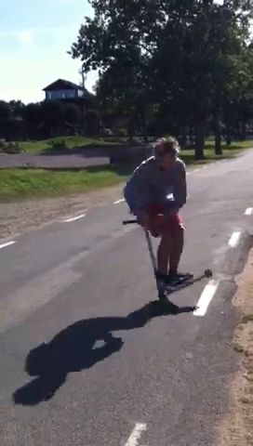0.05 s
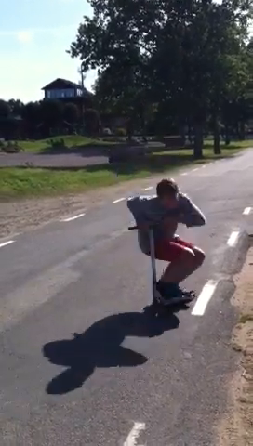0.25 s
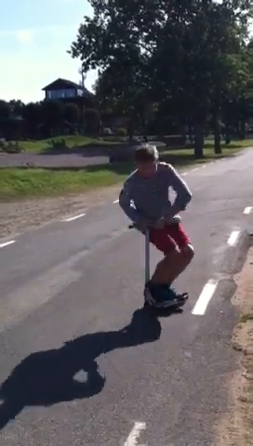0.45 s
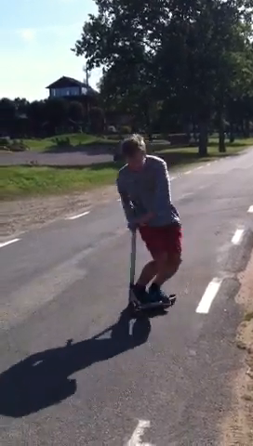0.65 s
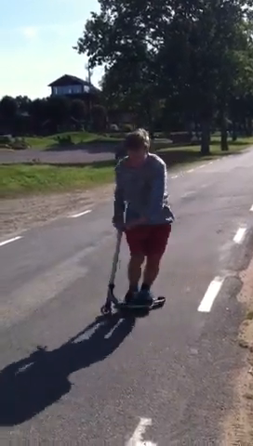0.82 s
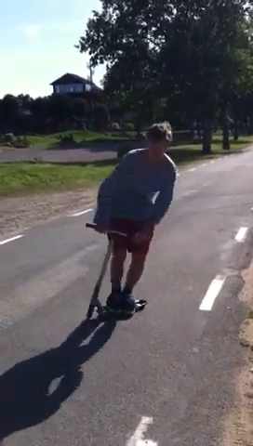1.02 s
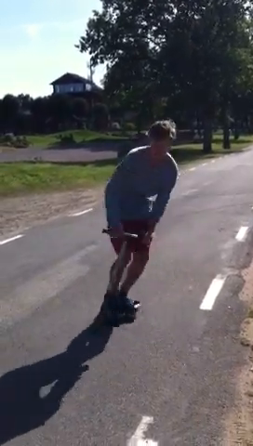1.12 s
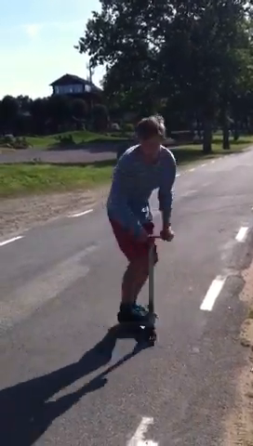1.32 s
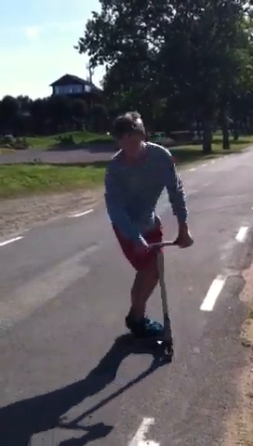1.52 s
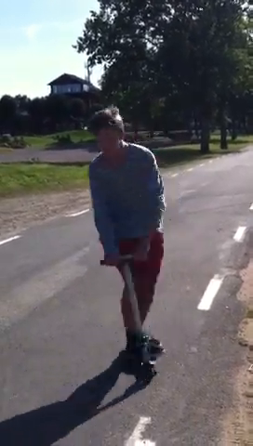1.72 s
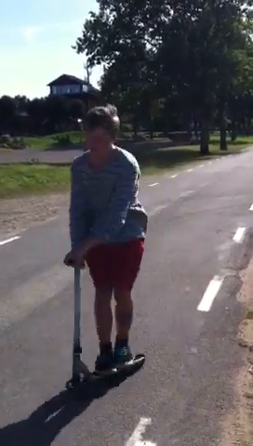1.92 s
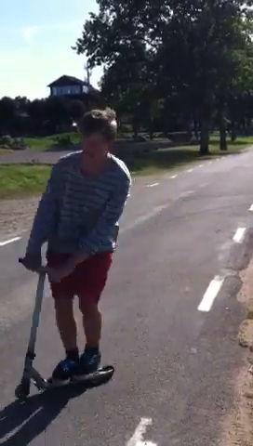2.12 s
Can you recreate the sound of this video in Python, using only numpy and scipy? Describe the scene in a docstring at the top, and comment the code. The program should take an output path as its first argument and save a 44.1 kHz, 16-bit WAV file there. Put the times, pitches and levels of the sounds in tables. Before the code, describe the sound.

A kick scooter lands on asphalt at about 0.2 seconds with one sharp, dry clack, echoing faintly off nearby trees. A loose part gives a single softer rattle at 0.7 seconds. The wheels roll on very quietly, with faint scuffs and ticks around 1, 1.4 and 2 seconds. Light wind puffs and sputters low on the microphone throughout, over a faint wash of outdoor air.

```python
"""A light wind puffs against the microphone, outdoors by an asphalt road. Then one dry clack: a kick
scooter drops out of a jump, both wheels and the deck hitting within a few milliseconds, and the trees
across the road scatter the sound back. A loose part rattles once, and the scooter rolls on quietly,
its wheels scuffing in the turns."""
import sys
import numpy as np
from scipy import signal
from scipy.fft import rfft, irfft, next_fast_len
from scipy.io import wavfile
from scipy.ndimage import map_coordinates

SR = 44100
rng = np.random.default_rng(int(sys.argv[2]) if len(sys.argv) > 2 else 0)


def wrap_up_sound(samples):
    """Save the sound to the file named by the first command line argument, as 16-bit audio."""
    columns = np.atleast_2d(samples).T
    # keep every value between -1 and 1, then stretch to whole-number steps
    tamed = np.clip(columns, -1, 1)
    steps = np.round(tamed * 32767).astype(np.int16)
    wavfile.write(sys.argv[1], SR, steps)


N = 94815


def amp(db):
    """Decibels to gain."""
    return 10 ** (np.asarray(db) / 20)


def unit(x):
    """Scale to rms 1."""
    return x / np.sqrt(np.mean(x ** 2) + 1e-20)


def clock():
    """The time of every sample, in seconds."""
    return np.arange(N) / SR


def filtered(x, response):
    """Pass x through a response, given as a function of frequency."""
    size = next_fast_len(N + SR // 2)
    return irfft(rfft(x, size) * response(np.fft.rfftfreq(size, 1 / SR)), size)[:N]


def colour(points):
    """The response through (f/Hz, level/dB) points on a log axis."""
    f, db = np.transpose(points)
    return lambda hz: amp(np.interp(np.log(hz + 1), np.log(f + 1), db))


def noise(response):
    """Coloured noise of rms 1."""
    return unit(filtered(rng.standard_normal(N), response))


def wobble(rate):
    """A smooth random curve, rate knots a second."""
    return map_coordinates(rng.standard_normal(int(N * rate / SR) + 4), [clock() * rate])


def struck(start, rise, t60):
    """An envelope that rises at start and dies away by 60 dB in t60 seconds."""
    age = np.maximum(clock() - start, 0)
    return (1 - np.exp(-age / rise)) * np.exp(-np.log(1000) * age / t60)


# Leaves and open air around the microphone: f/Hz, level/dB
AIR_SPECTRUM = [(15, -32), (25, 7), (82, -3.5), (204, 13.5), (368, -2.5), (495, 2), (598, -0.5),
                (826, -8.5), (919, -3), (1340, -2), (5280, -23.5), (15500, -24)]

def open_air(level_db=-57, waver_db=.5):
    """The roadside ambience: a faint wash of leaves and air that barely wavers."""
    return amp(level_db + waver_db * wobble(3.3)) * noise(colour(AIR_SPECTRUM))


def eddy(edge_hz, low_hz=123, low_order=6.3, high_order=4.25):
    """The band that an eddy excites on the microphone; small, quick eddies reach higher."""
    def band(hz):
        below = 1 + (low_hz / (hz + 1)) ** (2 * low_order)
        above = 1 + (hz / edge_hz) ** (2 * high_order)
        return 1 / np.sqrt(below * above)
    return band


# Gusts right on the microphone: start t/s, end t/s, rms level/dB, upper edge f/Hz
WIND_GUSTS = [(0, 0.047, -40, 270), (0.254, 0.283, -41, 376.6), (0.382, 0.491, -50, 318),
              (0.495, 0.582, -45, 350), (.585, 0.676, -44.5, 380), (0.784, 0.863, -45, 303),
              (0.883, 0.934, -39.5, 285), (0.933, 0.997, -39.5, 420), (0.995, 1.068, -39.5, 290),
              (1.075, 1.277, -43, 249), (1.278, 1.394, -40.5, 229), (1.692, 1.763, -41.5, 267),
              (1.783, 1.853, -50, 269), (1.876, 1.904, -49, 290), (2.031, 2.059, -46.5, 277),
              (2.063, 2.103, -52.5, 290)]

def wind_gusts(edge_s=.0042, sputter_db=2):
    """Longer gusts sputter on the microphone, starting and stopping abruptly."""
    t, out = clock(), np.zeros(N)
    for start, end, db, edge_hz in WIND_GUSTS:
        gate = (np.tanh((t - start) / edge_s) - np.tanh((t - end) / edge_s)) / 2
        flutter = gate * noise(eddy(edge_hz)) * amp(sputter_db * wobble(90))
        out += amp(db) * flutter * np.linalg.norm(gate) / np.linalg.norm(flutter)
    return out


# Puffs right on the microphone: t/s, peak level/dB, upper edge f/Hz
WIND_PUFFS = [(.035, -28, 284), (0.102, -35, 296), (.331, -30.5, 248), (.339, -26.5, 255),
              (.347, -25.5, 278), (0.441, -26, 300), (.459, -40, 327), (0.591, -30.5, 251),
              (.608, -26.5, 320), (.632, -34, 330), (.685, -28, 267), (.735, -36, 190), (.767, -35, 260),
              (.802, -30, 280), (1.001, -26, 232), (1.147, -35.5, 320), (1.371, -30, 251),
              (1.621, -38.5, 324), (1.735, -34, 255), (1.789, -25, 273)]

def wind_puffs():
    """Each single eddy gives the microphone a short, low thump."""
    out = np.zeros(N)
    for start, db, edge_hz in WIND_PUFFS:
        impulse = signal.unit_impulse(N, round(start * SR))
        phase_turn = np.exp(2j * np.pi * rng.random())
        thump = filtered(impulse, lambda hz: eddy(edge_hz)(hz) * phase_turn)
        out += amp(db) * thump / np.abs(thump).max()
    return out


# Wheels rolling on the road, as heard at the microphone: t/s, level/dB
ROLL_LEVELS = [(.21, -106), (.25, -67), (.55, -74.5), (.72, -83), (.95, -68), (1.4, -70), (1.65, -68.5),
               (2.15, -64)]
# Hiss of the asphalt under them: f/Hz, level/dB
ROLL_SPECTRUM = [(100, -9.5), (400, 5.5), (1300, 8.5), (2500, -2.5), (5000, -2), (16000, -10)]
# Scuffs of wheels and shoes: centre t/s, level/dB, half length t/s
SCUFF_STROKES = [(.175, -63, .012), (0.954, -64, 0.029), (1.34, -61.5, 0.029), (1.404, -61.5, .016),
                 (1.954, -59, 0.0098), (2.107, -63.5, 0.027)]
# Colour of a scuff: f/Hz, level/dB
SCUFF_SPECTRUM = [(200, 12.5), (850, 0), (1250, 8), (1700, 6), (2400, 5), (3400, 4), (6000, -4),
                  (16000, -2.5)]

def wheels(waver_db=1.0, grit_db=3.0):
    """Wheels hiss over the grain of the asphalt, with brief, gritty scuffs."""
    t = clock()
    roll_db = np.interp(t, *np.transpose(ROLL_LEVELS)) + waver_db * wobble(40)
    roll = amp(roll_db) * noise(colour(ROLL_SPECTRUM))
    strokes = sum(amp(db) * np.exp(-.5 * ((t - centre) / half) ** 2)
                  for centre, db, half in SCUFF_STROKES)
    grit = unit(noise(colour(SCUFF_SPECTRUM)) * amp(grit_db * wobble(500)))
    return roll + strokes * grit


# Ticks from the road and the deck: t/s, level/dB, tilt/(dB per octave)
GRIT_TICKS = [(0.044, -47, 0.5), (0.155, -48, -1.5), (.572, -59, 6.5), (0.652, -58, 1.5), (1.316, -52.5, 9),
              (1.389, -51.5, -0.5), (1.405, -50, 0), (1.953, -51.5, -2), (2.032, -59.5, 5)]
# Colour of a tick before its tilt: f/Hz, level/dB
TICK_SPECTRUM = [(300, 7), (1500, 13), (2400, -7.5), (3400, 3), (6000, -5), (15000, -4)]

def ticks():
    """Grit, and shoes on the deck, give faint ticks, some brighter than others."""
    out = np.zeros(N)
    for start, db, tilt_db in GRIT_TICKS:
        tilted = lambda hz: colour(TICK_SPECTRUM)(hz) * amp(tilt_db * np.log2(hz + 1))
        out += amp(db) * noise(tilted) * struck(start, rise=.0002, t60=.061)
    return out


# Returns from across the road, later with distance: delay t/s, level/dB, rise t/s, t60/s
TREE_ECHOES = [(.024, -43, 0.0055, 0.24), (0.062, -37, .001, .08), (0.075, -32.5, .014, .14),
               (0.131, -36.5, 0.016, .3), (.17, -61, .003, .1)]
# What the trees send back to the microphone: f/Hz, level/dB
TREE_SPECTRUM = [(200, -9), (690, -7), (790, 3.5), (880, -11.5), (1180, -7), (1450, 2), (1750, -7.5),
                 (2400, -16.5), (3400, -10), (4500, -18.5), (5700, -15), (8000, -26), (15000, -32)]

def tree_echoes(knocks):
    """Verge, trunks and leaves scatter the energy of the knocks into a few diffuse echoes."""
    energy_response = np.zeros(N)
    for delay, db, rise, t60 in TREE_ECHOES:
        tail = struck(delay, rise, t60)
        energy_response += (amp(db) * tail / np.linalg.norm(tail)) ** 2
    power = np.abs(signal.fftconvolve(knocks ** 2, energy_response)[:N])
    return np.sqrt(power) * noise(colour(TREE_SPECTRUM))


# The click of a loose part on the scooter: t/s, level/dB
RATTLE_CLICKS = [(0.69, -35.5)]
# Colour of the click: f/Hz, level/dB
CLICK_SPECTRUM = [(300, -8), (1100, 2), (2100, 0.5), (3200, -9), (4000, -2), (5300, -15), (7300, -11),
                  (10000, -20.5), (15000, -21)]
# Modes of the loose part: f/Hz, level/dB, t60/s
LOOSE_PART_MODES = [(1066, -8.5, .035), (2066, -9.5, 0.029), (2780, -12, .03), (3700, -11.5, .035),
                    (4050, -11, 0.034)]

def rattle():
    """A loose part clicks and rings briefly as the rider straightens up."""
    out = np.zeros(N)
    for start, db in RATTLE_CLICKS:
        age = clock() - start
        ring = sum(amp(mode_db) * np.sin(2 * np.pi * hz * age) * struck(start, rise=.0003, t60=t60)
                   for hz, mode_db, t60 in LOOSE_PART_MODES)
        click = noise(colour(CLICK_SPECTRUM)) * struck(start, rise=.00035, t60=.023)
        out += amp(db) * (ring + click)
    return out


# Wheels and deck hitting the road: t/s, ring level/dB, crack level/dB, hardness as cutoff f/Hz
LANDING_CONTACTS = [(0.221, -16, -18, 9000), (0.2232, -42, -13, 9000), (0.2244, -8, -33.5, 410),
                    (0.2286, -11, -31, 270), (0.2328, -29.5, -34.5, 830)]
# Modes of deck, fork and bar: f/Hz, level/dB, t60/s
FRAME_MODES = [(201, 4.5, 0.0088), (350, -4, .04), (430, 1.5, 0.041), (639, 7, .036), (765, 0.5, .042),
               (1030, 7.5, 0.032), (1116, 5.5, .015), (1215, 5, .03), (1340, -8, 0.021), (2077, -18, .033),
               (2980, -14.5, 0.077), (3300, -15, 0.059), (5110, -8, 0.018), (5700, -6, .018)]
# The crack of a contact on asphalt: f/Hz, level/dB
CRACK_SPECTRUM = [(60, -23), (300, -6), (1300, 1.5), (1900, -11.5), (3500, -3.5), (4300, -6.5), (5600, -1),
                  (8500, -8), (10000, -13), (15000, -14)]

def landing(choke_s=.02):
    """Each contact cracks and rings the frame; soft contacts reach only its low modes."""
    t, out = clock(), np.zeros(N)
    for start, ring_db, crack_db, hardness_hz in LANDING_CONTACTS:
        for hz, mode_db, t60 in FRAME_MODES:
            gain = amp(ring_db + mode_db) / np.sqrt(1 + (hz / hardness_hz) ** 4)
            out += gain * np.cos(2 * np.pi * hz * (t - start)) * struck(start, rise=.00032, t60=t60)
        out += amp(crack_db) * noise(colour(CRACK_SPECTRUM)) * struck(start, rise=.0002, t60=.021)
    since_touchdown = np.maximum(t - LANDING_CONTACTS[0][0], 0)
    return out / (1 + (since_touchdown / choke_s) ** 6)  # the rider's weight chokes the ring


def scene():
    """Scooter, echoes, wind and open air meet at one microphone, across the road from the trees."""
    knocks = landing() + rattle()
    air = open_air()
    scooter = knocks + tree_echoes(knocks) + wheels() + ticks()
    wind = wind_puffs() + wind_gusts()
    return (air + wind + scooter)[None]


def record(dry):
    """The microphone drops the deep bass and keeps nothing above its band limit."""
    low_cut_hz, top_hz, fade_width_hz = 72, 15900, 200
    thin = signal.sosfilt(signal.butter(2, low_cut_hz, 'high', fs=SR, output='sos'), dry)
    band_limit = lambda hz: np.clip((top_hz - hz) / fade_width_hz + .5, 0, 1)
    return np.array([filtered(channel, band_limit) for channel in thin])


dry = scene()
out = record(dry)
wrap_up_sound(out)
```